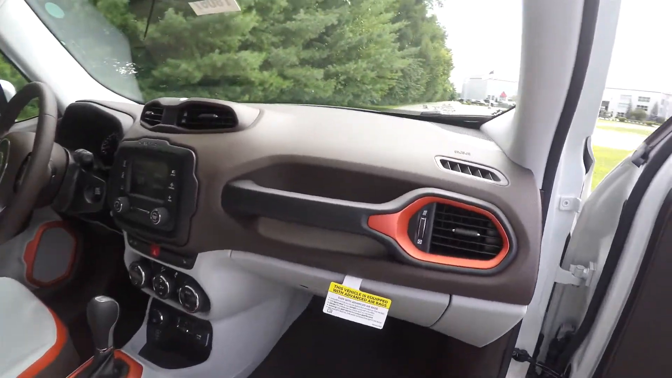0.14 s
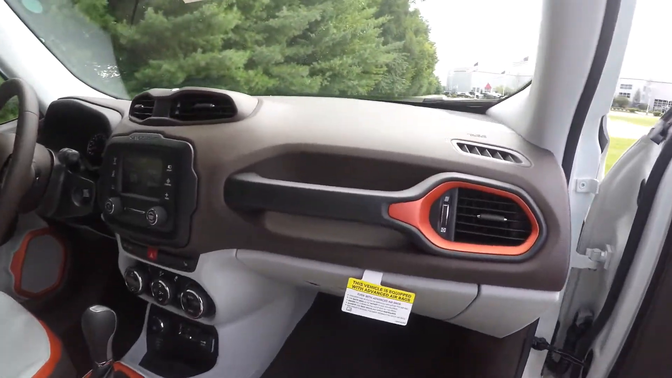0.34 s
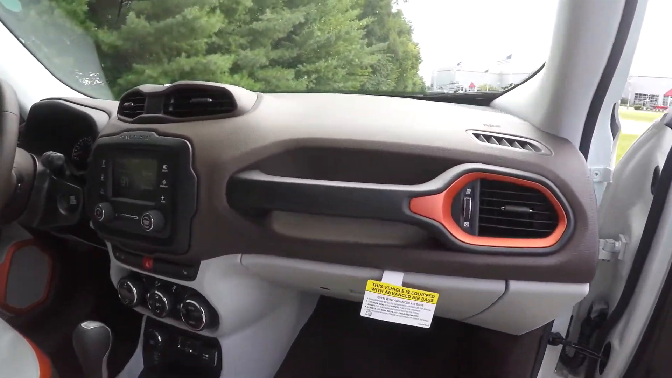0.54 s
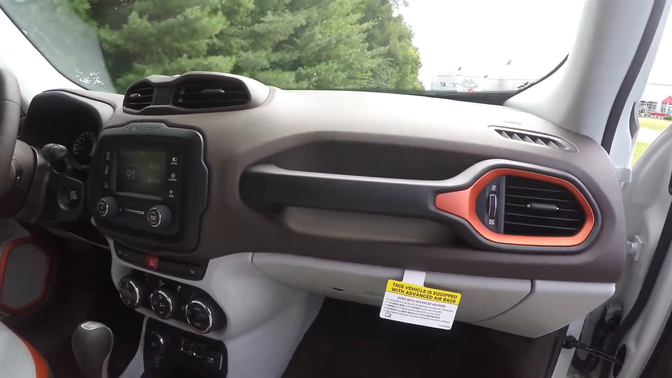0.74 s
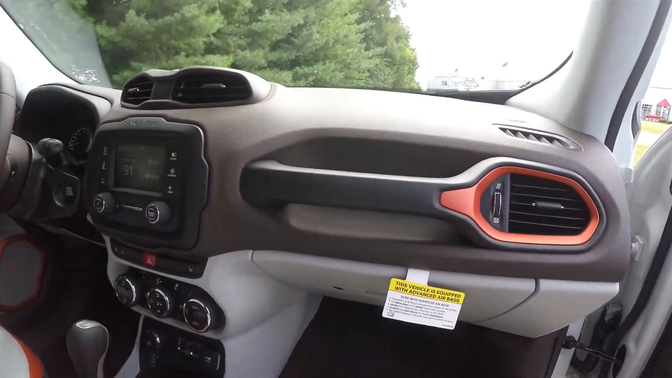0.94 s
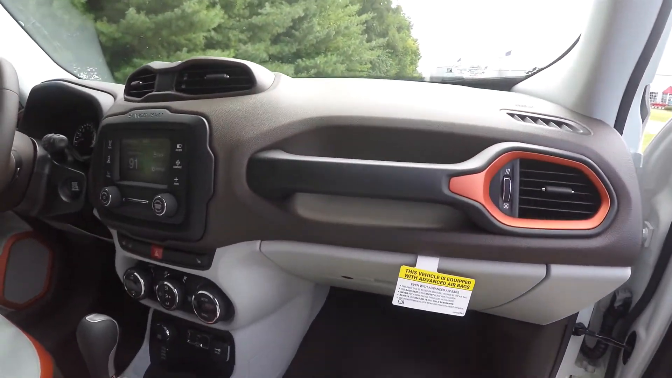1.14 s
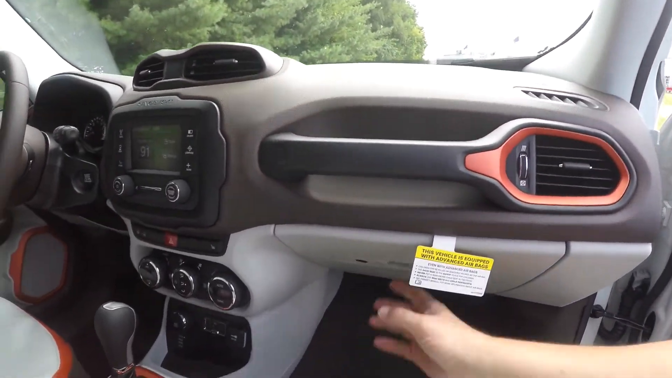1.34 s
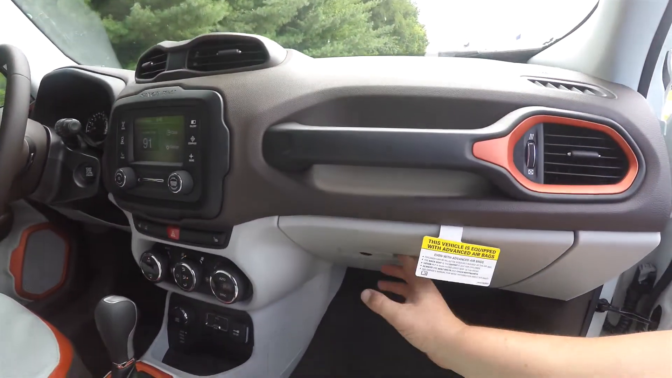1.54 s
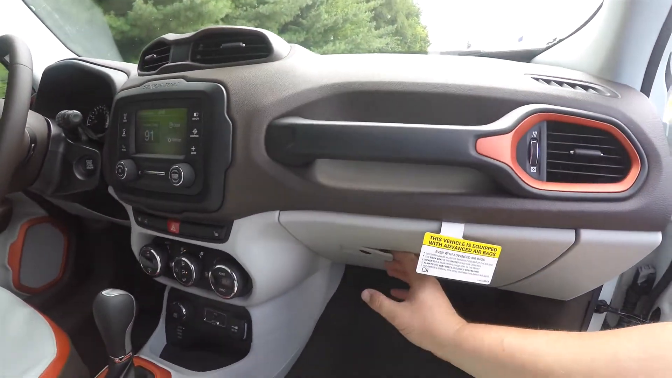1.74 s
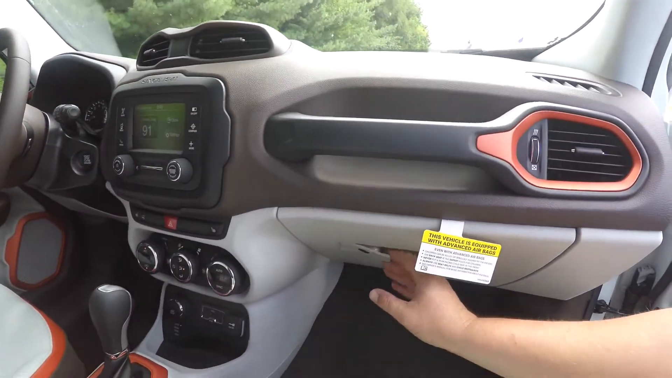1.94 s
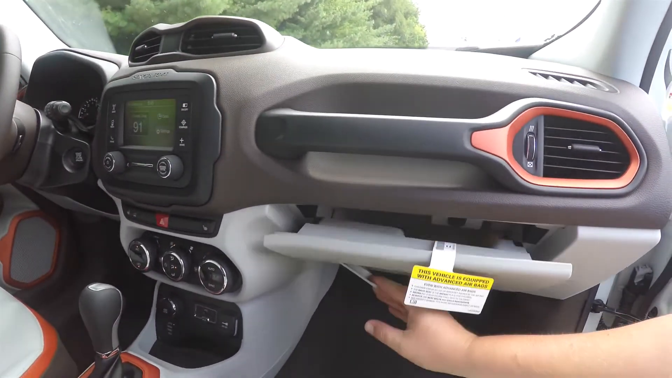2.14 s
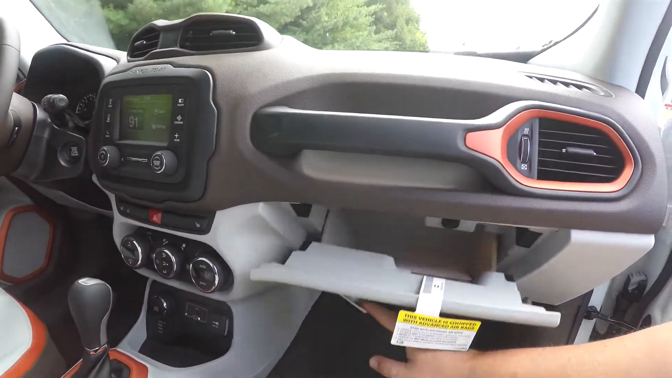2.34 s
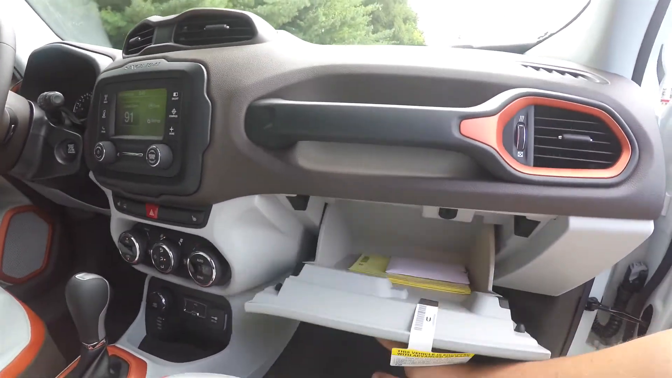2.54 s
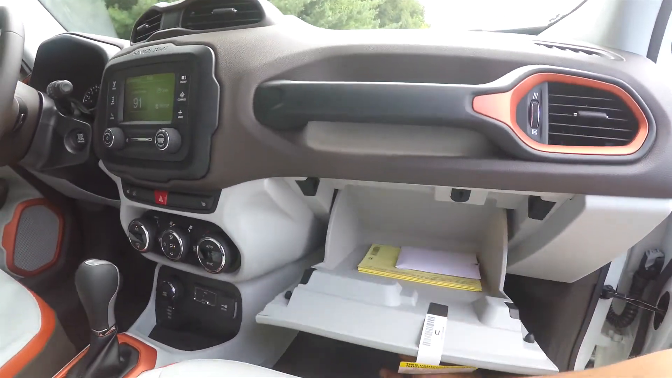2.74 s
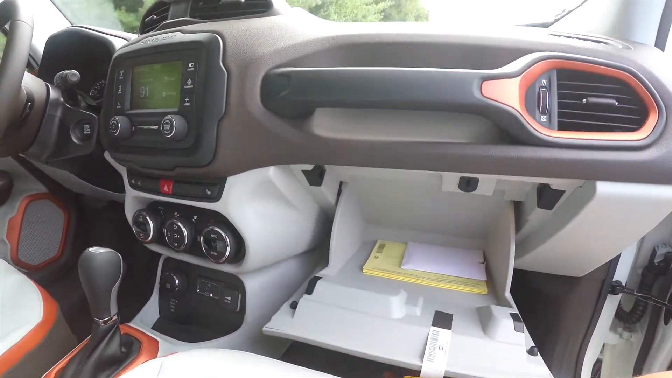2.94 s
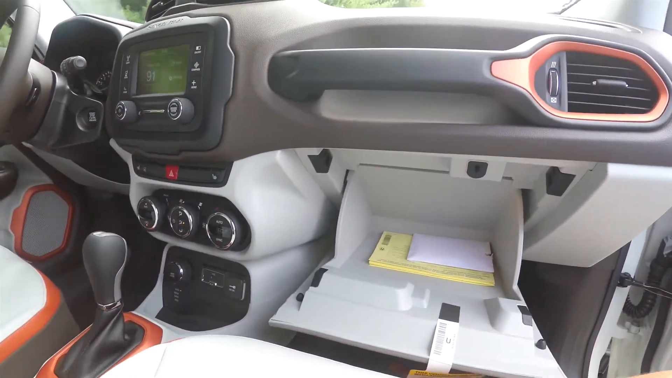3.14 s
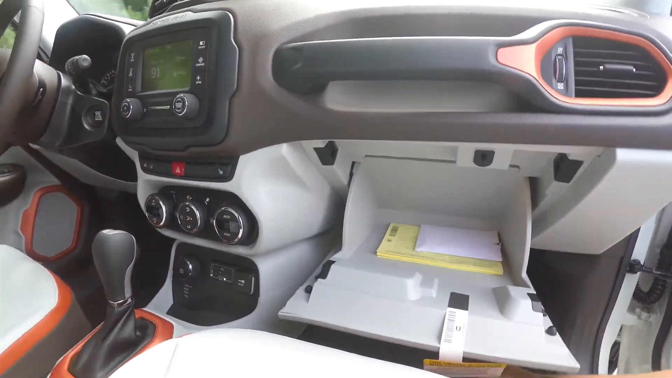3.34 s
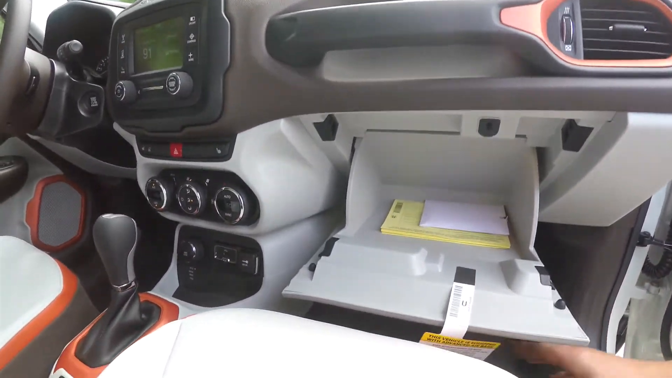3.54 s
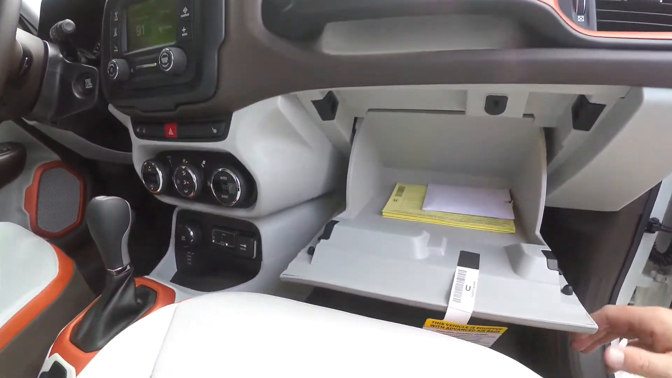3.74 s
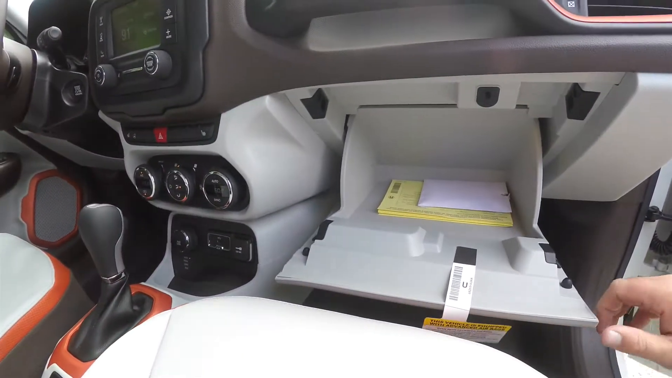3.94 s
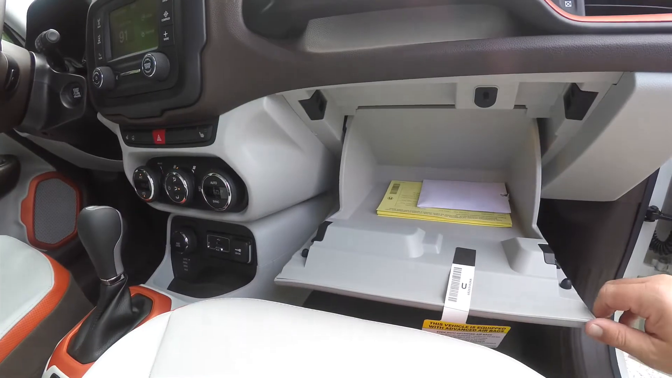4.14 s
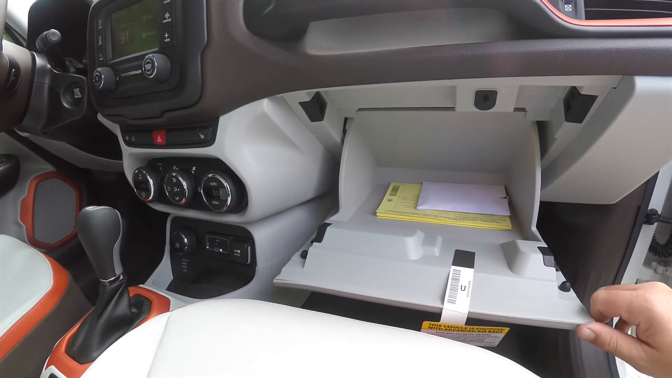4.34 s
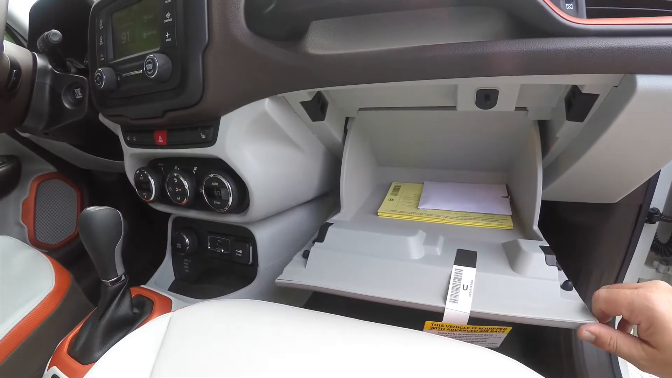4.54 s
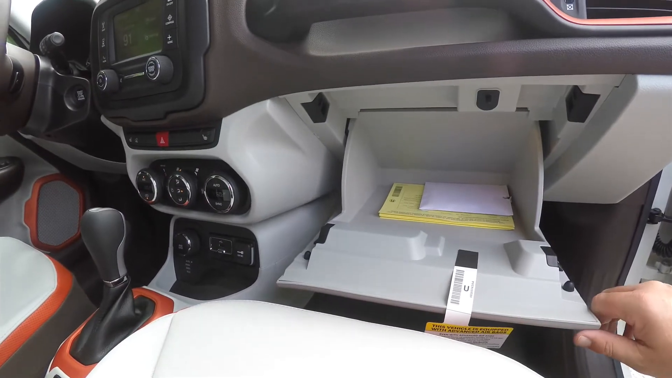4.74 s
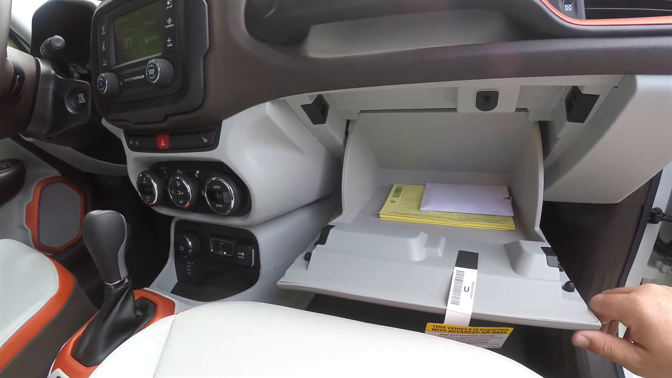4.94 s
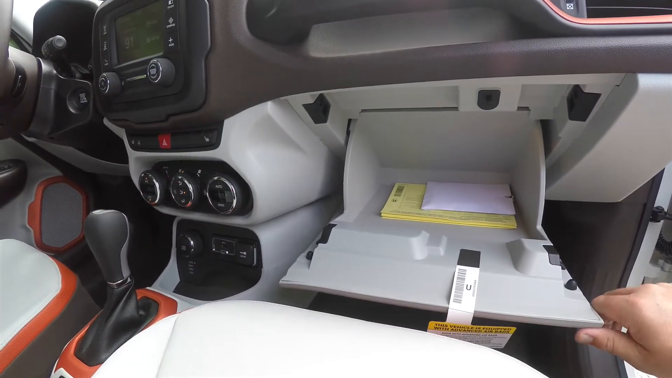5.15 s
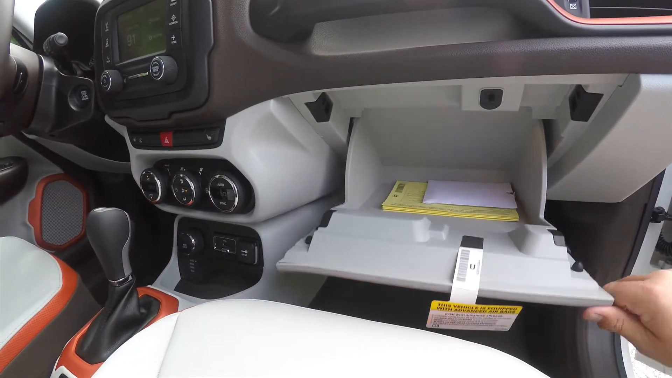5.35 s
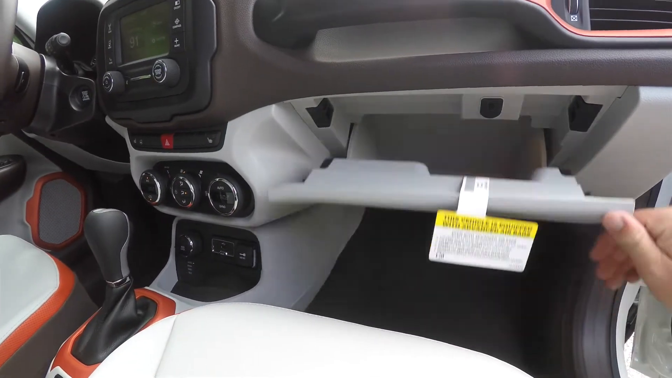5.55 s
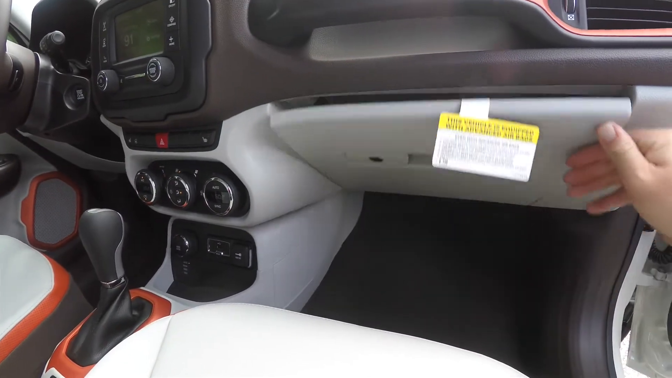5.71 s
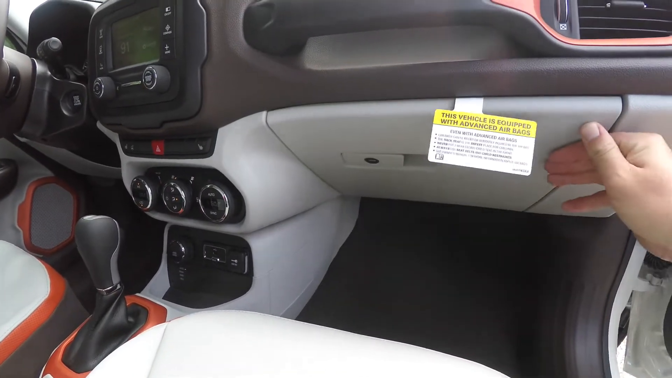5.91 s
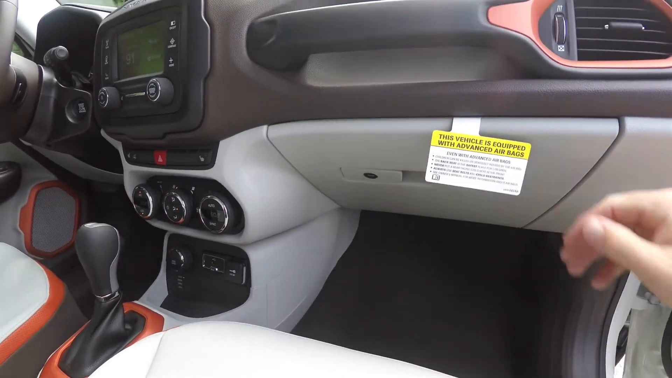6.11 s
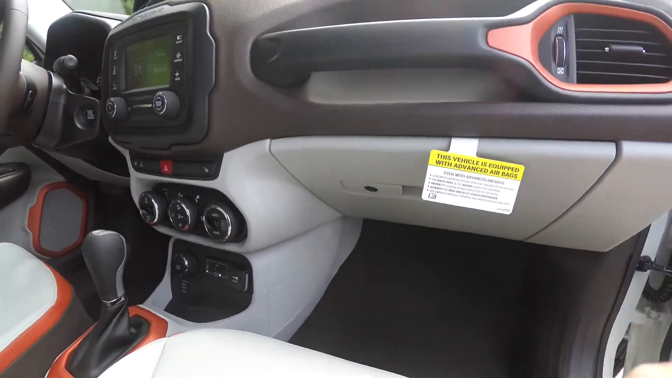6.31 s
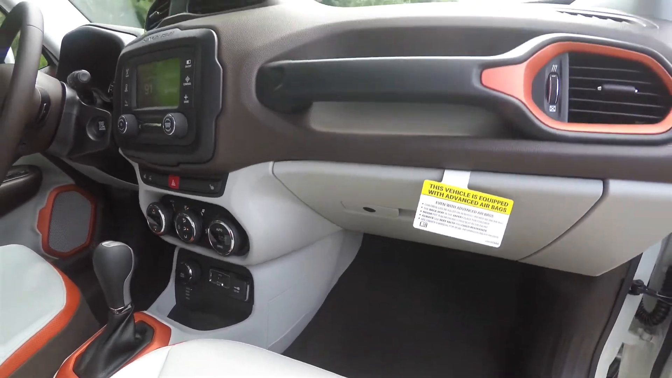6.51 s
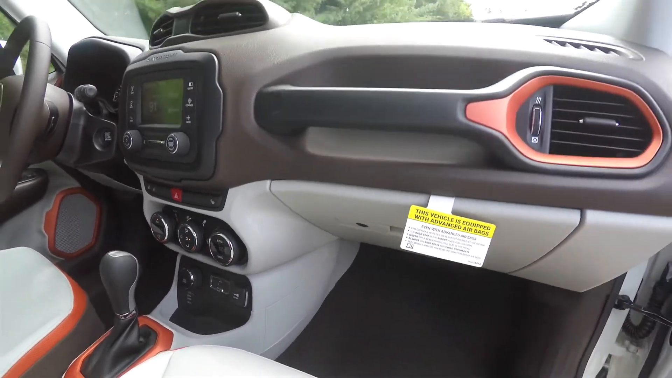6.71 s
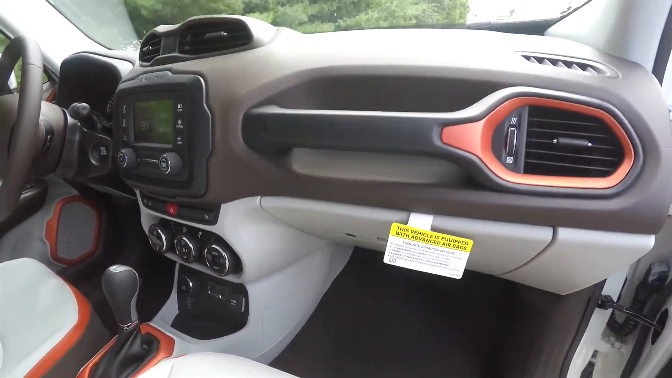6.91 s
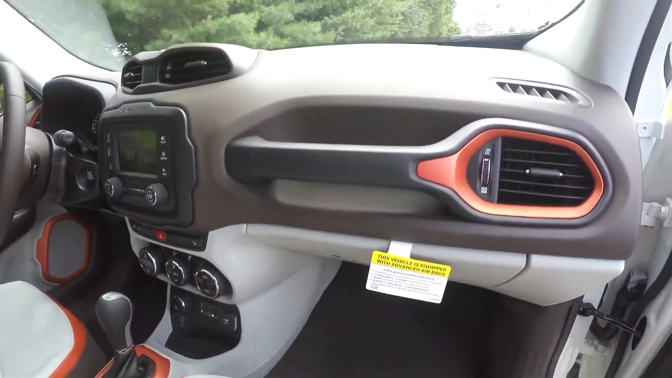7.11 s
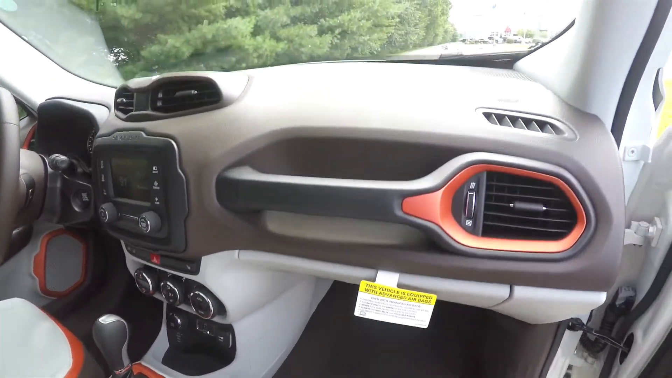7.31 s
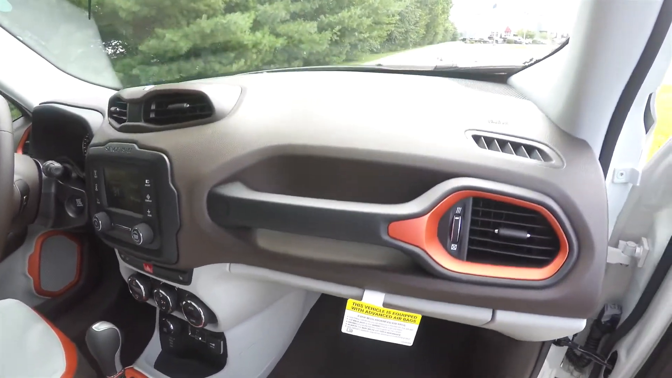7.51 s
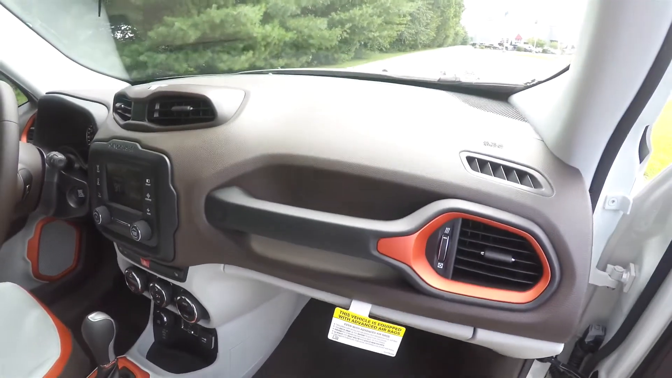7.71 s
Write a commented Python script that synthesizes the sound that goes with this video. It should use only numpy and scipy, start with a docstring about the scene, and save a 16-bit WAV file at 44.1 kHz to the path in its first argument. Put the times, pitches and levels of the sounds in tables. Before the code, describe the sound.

A steady airy hiss and a faint idling throb fill a parked car throughout, with soft hollow rubs, light dull knocks and occasional sleeve swishes from handling. At about 2 seconds, close to the microphone, a plastic glovebox latch releases with a sharp click and a small low thump. A lighter tick follows at 2.3 seconds, then a faint juddering scrape and a tap near 2.9. At 3.3 seconds the lid drops onto its stop with a loud, hollow clack and a brief rattle. A distant, low, beating machine drone grows from around 5 seconds. At 5.8 seconds the lid is pushed shut with a loud snap, a quick cluster of plastic clicks over a low thump, dying quickly in the padded cabin. The drone slowly sinks and weakens, while more rubs, cloth swishes and one tiny tick near 7.4 seconds carry on until about 8 seconds.

```python
"""A plastic glovebox, close to the microphone, is unlatched, drops onto its stop and is pushed shut.
We sit in a parked, idling car with its door open. Each contact rings the lid and scatters briefly in
the padded cabin; the latch and the slam also pump the cabin air. Around it are soft rubs and knocks of
handling and the swish of a sleeve; behind, a steady airy hiss and the engine's throb. Far off, the
beating drone of a machine swells and sinks."""
import sys
import numpy as np
from scipy import signal
from scipy.fft import rfft, irfft, next_fast_len
from scipy.io import wavfile
from scipy.ndimage import uniform_filter1d, map_coordinates

SR = 44100
rng = np.random.default_rng(int(sys.argv[2]) if len(sys.argv) > 2 else 0)


def master_out(mix):
    """Clip the mix to full scale and print it as 16-bit PCM to the path in sys.argv[1]."""
    frames = np.transpose(np.atleast_2d(mix))
    ceiling = np.clip(frames, -1, 1)
    pcm = np.round(ceiling * 32767).astype(np.int16)
    wavfile.write(sys.argv[1], SR, pcm)


N = 347067

# Colours of the air's rush, hiss and fizz, of a knock, of the sleeve and of the clattering dashboard.
# Each row: frequency in Hz, relative spectral density in dB.
RUSH_COLOUR = [(15, -8), (32, -7.5), (48, 7), (72, -9.5), (105, 1.5), (145, -1.5), (190, -1.5), (290, -5.5),
               (360, -13), (600, -4.5), (1200, -3), (2350, -8), (2850, -22.5), (4000, -58)]
HISS_COLOUR = [(2000, -14), (3000, -3), (3800, -4), (4650, 2.5), (5700, -14.5), (6500, -11), (7100, -17),
               (7700, -15), (8900, -28), (9800, -19.5), (11000, -47.5), (15000, -63)]
FIZZ_COLOUR = [(5000, -23), (9000, 5.5), (11500, 0.5), (13500, -15), (15000, -18.5)]
KNOCK_COLOUR = [(100, -8.5), (350, -6), (550, 1.5), (800, 4.5), (1300, 1), (2200, -2.5), (3200, -27.5),
                (9000, -64), (15000, -89)]
CLOTH_COLOUR = [(2000, -23), (3200, -4.5), (4500, 4), (5600, -7), (6500, -6), (8000, -13), (9500, -20.5),
                (11500, -31.5), (15000, -46)]
PANEL_COLOUR = [(90, -9.5), (170, -5), (450, -1.5), (900, -2), (1650, -3.5), (2300, 0.5), (3100, -9.5),
                (4600, -8.5), (5500, -17), (6500, -19), (8700, -29), (9800, -22.5), (15000, -41)]
# The engine at idle. Each row: multiple of the firing rate, level in dB.
IDLE_HARMONICS = [(1, -40), (2, -51.5), (4, -65.5), (8, -60)]
# The far drone. Each row: time in seconds, pitch in Hz, main tone in dB, lower beating tone in dB.
DRONE_PATH = [(2.5, 209.5, -62, -60), (3.2, 209, -54.5, -61), (4.6, 208.9, -55, -53.5),
              (4.95, 217.6, -46, -49.5), (5.3, 208.9, -41.5, -50), (5.75, 207.3, -38.5, -64),
              (5.97, 211.3, -41.5, -47), (6.6, 208.3, -41, -44.5), (7.4, 204.6, -46, -46),
              (7.87, 196.6, -48.5, -52)]
# Its faint companions. Each row: frequency ratio to the main tone, level against it in dB.
DRONE_COMPANIONS = [(.46, -13), (1.191, -14.5)]
# Soft, hollow rubs. Each row: middle and length in seconds, level in dB, centre and width in Hz.
HAND_RUBS = [(0.293, 1.85, -42, 916, 267), (1.605, 1.78, -43.5, 922, 360), (3.79, 1.1, -45, 840, 225),
             (4.4, 0.33, -43, 1100, 495), (4.93, 0.47, -45.5, 1020, 280), (6.918, 0.77, -46, 886, 400),
             (7.547, 0.66, -40, 996, 460)]
# Light, dull knocks. Each row: start in seconds, relative level in dB, pitch in Hz.
HAND_KNOCKS = [(0.437, -25.5, 850), (0.459, -27, 520), (0.667, -25.5, 940), (0.888, -28, 650),
               (1.008, -24.5, 690), (1.655, -29, 630), (1.752, -27, 850), (2.1, -26.5, 800),
               (2.695, -25, 860), (2.779, -26, 815), (3.752, -25, 764), (3.867, -23.5, 785),
               (4.294, -23, 930), (6.391, -30.5, 694), (6.963, -26.5, 820), (7.482, -24, 930),
               (7.595, -26.5, 990)]
# The arm reaches in, shifts and draws back.
# Each row: middle and length in seconds, level in dB, tilt in dB per octave.
SLEEVE_STROKES = [(1.1, 0.47, -59.5, -1), (1.46, 0.94, -57, -14), (4.076, .36, -58, 1),
                  (4.32, 0.44, -64, 7), (6.45, 0.48, -65.5, 11), (7.12, 0.41, -50, -1),
                  (7.46, 0.45, -54.5, 0)]
# Blows on the lid: latch release, its knock and spring, hinge tick and knock, a tap on the way down,
# two open stops and their rattle, two strikes, snap, catch and seating, a last tick.
# Each row: start in seconds, level in dB, flex in dB, flex centre in Hz, brightness in dB,
# its lower edge in Hz, t60 in seconds, time between rebounds in seconds.
LID_BLOWS = [(2.0333, -17.5, 4.5, 430, -4, 3300, 0.022, 0.002),
             (2.0495, -32, 10, 450, 3, 3300, 0.035, .004), (2.0537, -31, -1, 500, 7, 3500, 0.024, 0.0044),
             (2.3102, -31, 2.5, 800, 1, 6510, 0.03, 0.0036), (2.319, -39, 17, 360, -11, 3300, 0.053, .006),
             (2.899, -27.5, 0.5, 650, -30, 3000, 0.043, 0.0048),
             (3.3215, -13, 3.5, 320, 0.5, 3300, 0.024, .002),
             (3.3262, -23, 10, 800, 0, 3300, 0.022, 0.0018),
             (3.339, -31.5, 9.5, 780, -5, 3300, 0.037, .005),
             (5.7643, -16.5, -2, 560, -3, 3300, 0.037, .003),
             (5.777, -15.5, -6, 600, 0.5, 5500, 0.041, .002),
             (5.802, -12.5, -4.5, 420, 4, 3300, 0.021, 0.0029),
             (5.809, -19.5, 4, 700, -5, 3300, 0.023, 0.0032), (5.8146, -24.5, 7, 660, 0, 3300, 0.027, .006),
             (7.3835, -45, -4, 501, 27, 8500, .007, .001)]
# The lid's resonances. Each row: centre in Hz, width in Hz, level over the clatter in dB.
LID_MODES = [(172, 24, 6.5), (343, 28, -13), (440, 56, 2), (490, 28, -10), (597, 39, 1.5), (734, 37, 8),
             (867, 36, -3.5), (990, 36, 0.5), (1218, 54, 2.5), (1854, 135, -2), (2130, 114, 1.5),
             (2340, 72, 1.5), (4540, 200, -3), (4900, 200, 3.5), (6230, 120, -2), (7850, 140, 4.5)]
# The padded cabin's decay. Each row: frequency in Hz, t60 in seconds.
CABIN_DECAY = [(200, 0.098), (1000, 0.054), (4000, 0.083), (12000, 0.032)]
# Air pumped by the lid. Each row: start in seconds, level in dB.
AIR_PUSHES = [(2.042, -27), (5.799, -22.5), (5.843, -23)]
# The lid judders down its guide.
# Each row: middle and length in seconds, level in dB, centre and width in Hz.
GUIDE_SCRAPES = [(2.562, 0.22, -43.5, 1970, 420), (2.754, .2, -46.5, 1780, 696)]
# The open stops and the snap jolt the bin. Each row: start in seconds, strength in dB.
BIN_JOLTS = [(3.3197, -0.5), (5.8, -13.5)]
# The hollow bin's low modes. Each row: frequency in Hz, relative level in dB, t60 in seconds.
BIN_MODES = [(178.5, -30.5, 0.23), (344, -15.5, 0.049), (492, -15, 0.067), (595, -16.5, 0.041),
             (754, -24.5, 0.072), (836, -31, 0.1)]
# The microphone's two ports swing in and out of step.
# Each row: frequency in Hz, left-right correlation before limiting.
PORT_CORRELATION = [(300, 0.98), (900, 0.94), (1600, 0.78), (2350, 0.92), (2780, -0.21), (3080, -0.91),
                    (3500, -1.022), (4600, -0.69), (5400, -1.125), (5850, -0.57), (6300, 0.98),
                    (6800, 0.65), (7800, 0.88), (8700, 0.5), (9900, -1.13), (11500, 0.068)]


def amp(db):
    """Decibels to gain."""
    return 10 ** (np.asarray(db) / 20)


def unit(x):
    """Scaled to rms 1."""
    return x / np.sqrt(np.mean(x ** 2) + 1e-20)


def along(points, hz):
    """Read (Hz, value) points on a log frequency axis."""
    frequencies, values = np.transpose(points)
    return np.interp(np.log(hz + 1), np.log(frequencies + 1), values)


def wobble(rate):
    """A smooth random curve, rate knots a second."""
    knots = rng.standard_normal(int(N * rate / SR) + 4)
    return map_coordinates(knots, [np.arange(N) * rate / SR])


def filtered(x, response):
    """Shape x by a frequency response."""
    n = x.shape[-1]
    size = next_fast_len(n + SR // 10)
    return irfft(rfft(x, size) * response(np.fft.rfftfreq(size, 1 / SR)), size)[..., :n]


def noise(colour):
    """Two unrelated noises of rms 1 with the given colour."""
    return unit(filtered(rng.standard_normal((2, N)), lambda hz: amp(along(colour, hz))))


def add(track, s, sound):
    """Mix a sound into the track from time s."""
    part = track[:, round(s * SR):][:, :sound.shape[-1]]
    part += sound[..., :part.shape[-1]]


def fade(t, t60, rise_s):
    """A quick rise and an exponential decay."""
    return np.exp(-np.log(1000) * t / t60) * (1 - np.exp(-t / rise_s))


def swell(t, middle, length):
    """A smooth rise and fall in time."""
    return np.exp(-(2 * (t - middle) / length) ** 2)


def bump(hz, centre_hz, spread):
    """A bell curve on a log frequency axis."""
    return np.exp(-(np.log((hz + 1) / centre_hz) / spread) ** 2)


def resonance(hz, centre_hz, width_hz):
    """The complex response of one damped mode."""
    return 1j * hz * width_hz / (centre_hz ** 2 - hz ** 2 + 1j * hz * width_hz)


def scatter(t60, rise_s, even_hz=90):
    """A dying burst of dense reflections, even in frequency, for each channel."""
    t = np.arange(SR // 4) / SR
    shape = fade(t, t60, rise_s)
    spectrum = rfft(rng.standard_normal((2, len(t))) * shape, SR)
    spectrum /= np.sqrt(np.abs(uniform_filter1d(np.abs(spectrum) ** 2, even_hz)) + 1e-12)
    burst = irfft(spectrum, SR)[:, :len(t)]
    return burst * np.linalg.norm(shape) / np.linalg.norm(burst, axis=1, keepdims=True)


def air(rush_db=-41, hiss_db=-58.5, fizz_db=-93.5, hiss_db_per_s=0.3242, fizz_db_per_s=2):
    """A steady broad rush all round, with a finer hiss and fizz that slowly grow."""
    t = np.arange(N) / SR
    rush = amp(rush_db + 0.12 * wobble(2.6) + wobble(12) / 2) * noise(RUSH_COLOUR)
    hiss = amp(hiss_db + hiss_db_per_s * t + wobble(3.48) / 2) * noise(HISS_COLOUR)
    fizz = amp(fizz_db + fizz_db_per_s * t + wobble(5)) * noise(FIZZ_COLOUR)
    return rush + hiss + fizz


def engine(firing_hz=22.04, drift=0.00814):
    """The idle, heard from inside, throbs at the firing rate; its weaker multiples waver."""
    phase = 2 * np.pi * np.cumsum(firing_hz * (1 + drift * wobble(3.04))) / SR
    return sum(amp(db + np.sqrt(k) * wobble(5.7) / 2) * unit(np.sin(k * phase))
               for k, db in IDLE_HARMONICS)


def distant_machine(lower_ratio=.906, waver_db=1, waver_hz=0.826):
    """Far off, two close tones sink together and beat against each other, with faint companions."""
    times, *columns = np.transpose(DRONE_PATH)
    hz, main_db, lower_db = [np.interp(np.arange(N) / SR, times, column) for column in columns]
    phase = 2 * np.pi * np.cumsum(hz + waver_hz * wobble(8)) / SR

    def tone(ratio, db):
        return amp(db + waver_db * wobble(9.9)) * unit(np.sin(ratio * phase + 0.42 * wobble(9)))

    beating = tone(1, main_db) + tone(lower_ratio, lower_db)
    return beating + sum(tone(ratio, main_db + db) for ratio, db in DRONE_COMPANIONS)


def rubs(steepness=2.2, flutter_db=2.1):
    """Each rub swells and fades in one broad resonance, fluttering under an uneven grip."""
    out, t = np.zeros((2, N)), np.arange(N) / SR
    for s, length, db, centre_hz, width_hz in HAND_RUBS:
        band = lambda hz: 1 / (1 + ((hz - centre_hz) / width_hz) ** 2) ** steepness
        out += amp(db) * swell(t, s, length) * unit(filtered(rng.standard_normal((2, N)), band))
    return out * amp(flutter_db * np.tanh(wobble(25)))


def knocks(level_db=-3.7, t60=0.066, hollow_db=10):
    """Soft touches on plastic close by: dull bursts, each hollow at the pitch of the spot touched."""
    out, margin = np.zeros((2, N)), SR // 100
    for s, db, pitch_hz in HAND_KNOCKS:
        tone = lambda hz: unit(amp(along(KNOCK_COLOUR, hz) + hollow_db * bump(hz, pitch_hz, 0.26)))
        burst = np.pad(scatter(t60, rise_s=0.0017), ((0, 0), (margin, 0)))
        add(out, s - margin / SR, amp(db + level_db) * filtered(burst, tone))
    return out


def sleeve(pivot_hz=5000, folds_db=1.8, grain_db=2):
    """Cloth slides over cloth in strokes, uneven from its folds and grainy from its threads."""
    out, t = np.zeros((2, N)), np.arange(N) / SR
    for s, length, db, tilt_db in SLEEVE_STROKES:
        tilt = lambda hz: amp(tilt_db * np.log2(np.maximum(hz / pivot_hz, 1 / 2)))
        out += amp(db) * swell(t, s, length) * unit(filtered(noise(CLOTH_COLOUR), tilt))
    return out * unit(amp(folds_db * wobble(22) + grain_db * wobble(700)))


def contacts(s, db, flex_db, bright_db, rebound_s, lead_s=.0037, loss_db=7, fuller_db=2):
    """The lid's edge touches first, lighter and harder; then the blow and two weaker, fuller rebounds."""
    touch = (s - lead_s, db - 5, flex_db - fuller_db, bright_db + 2.5)
    hits = [(s + k * rebound_s, db - k * loss_db, flex_db + k * fuller_db, bright_db) for k in range(3)]
    return [touch] + hits


def contact_tone(hz, flex_db, flex_hz, bright_db, edge_hz):
    """Where a blow lands sets how the lid flexes; a hard edge excites the treble."""
    treble = 1 / (1 + (edge_hz / (hz + 1)) ** 6)
    return amp(flex_db * bump(hz, flex_hz, spread=0.55) + bright_db * treble)


def plastic(hz):
    """The lid's resonances stand out of the broad response of the panels."""
    ring = sum(amp(db) * resonance(hz, centre, width) for centre, width, db in LID_MODES)
    response = amp(along(PANEL_COLOUR, hz)) * (1 + ring)
    return response / np.sqrt(np.mean(np.abs(response) ** 2))


def lid():
    """Close up, each contact is a burst of its own weight and hardness, ringing the same plastic."""
    blows = np.zeros((2, N))
    for start, level_db, flex_db, flex_hz, bright_db, edge_hz, t60, rebound_s in LID_BLOWS:
        for s, db, flex, bright in contacts(start, level_db, flex_db, bright_db, rebound_s):
            tone = lambda hz: contact_tone(hz, flex, flex_hz, bright, edge_hz)
            add(blows, s, amp(db) * filtered(scatter(t60, rise_s=0.000092), tone))
    return filtered(blows, plastic)


def cabin(x):
    """Seats and carpet soak up the reflections within a tenth of a second."""
    hz, t, spectra = signal.stft(rng.standard_normal((2, SR // 4)), SR, nperseg=256)
    decay = fade(t, along(CABIN_DECAY, hz)[:, None], rise_s=0.0086)
    _, tail = signal.istft(spectra * decay, SR, nperseg=256)
    return signal.fftconvolve(x, tail / np.linalg.norm(tail[0]), axes=1)[:, :N]


def pumped_air(boom_hz=46, t60=0.16):
    """The moving lid sets the cabin air swinging for a few cycles."""
    out, t = np.zeros((2, N)), np.arange(SR // 2) / SR
    for s, db in AIR_PUSHES:
        add(out, s, amp(db) * np.sin(2 * np.pi * boom_hz * t) * fade(t, t60, rise_s=0.0012))
    return out


def scrapes(slips_per_s=420, uneven_db=3):
    """The sliding guide sticks and slips at an uneven rate; each slip briefly rings the plastic."""
    out, t = np.zeros((2, N)), np.arange(N) / SR
    for s, length, db, centre_hz, width_hz in GUIDE_SCRAPES:
        slips = (rng.random(N) < slips_per_s / SR) * amp(uneven_db * rng.standard_normal((2, N)))
        ringing = filtered(slips, lambda hz: resonance(hz, centre_hz, width_hz) ** 2)
        out += amp(db) * swell(t, s, length) * unit(ringing)
    return out


def hollow_bin():
    """Caught at either end of its travel, the bin rings its low modes, neighbours in opposite sense."""
    out, t = np.zeros((2, N)), np.arange(SR // 2) / SR
    for s, jolt_db in BIN_JOLTS:
        for k, (hz, db, t60) in enumerate(BIN_MODES):
            mode = np.sin(2 * np.pi * hz * t) * fade(t, t60, rise_s=0.00052)
            add(out[:1], s, (-1) ** k * amp(jolt_db + db) * mode)  # mid channel only
    return out


def microphone(pair, min_correlation, lead_s=.000045, lead_hz=1900, right_db=.6):
    """Mid and side reach two ports: the left leads a little in the mid range, the right is louder."""
    def mid_side_gains(hz):
        correlation = np.clip(along(PORT_CORRELATION, hz), min_correlation, .995)
        angle = np.arccos(correlation) / 2
        return np.array([np.cos(angle), 1j * np.sin(angle)])

    mid, side = filtered(pair, mid_side_gains)
    lead = lambda hz: np.exp(1j * np.pi * hz * lead_s / (1 + (hz / lead_hz) ** 6))
    left = filtered(mid + side, lead) * amp(-right_db / 2)
    right = filtered(mid - side, lambda hz: 1 / lead(hz)) * amp(right_db / 2)
    return np.array([left, right])


def scene(cabin_db=-14):
    """The glovebox in front, the softer sounds around it; the near lid cancels less between the ports."""
    box = lid() + hollow_bin()
    near = box + amp(cabin_db) * cabin(box) + pumped_air() + knocks()
    foreground = microphone(near, min_correlation=-.86)
    around = air() + rubs() + sleeve() + scrapes() + engine() + distant_machine()
    return foreground + microphone(around, min_correlation=-.995)


def record(dry, top_hz=15300):
    """The microphone chain passes nothing above its band limit."""
    return filtered(dry, lambda hz: 1 / (1 + (hz / top_hz) ** 160))


dry = scene()
out = record(dry)
master_out(out)
```